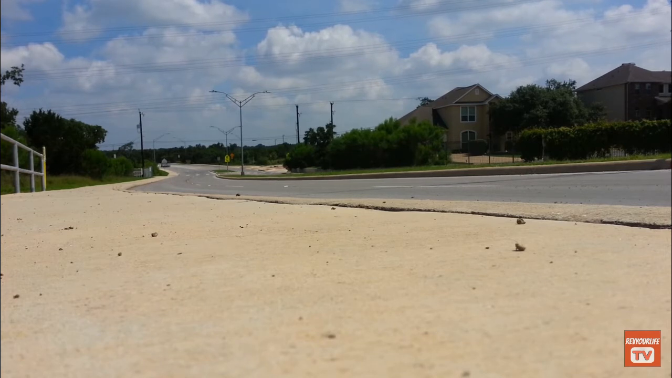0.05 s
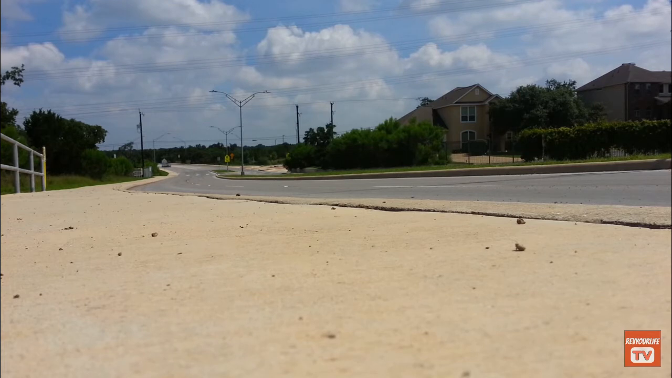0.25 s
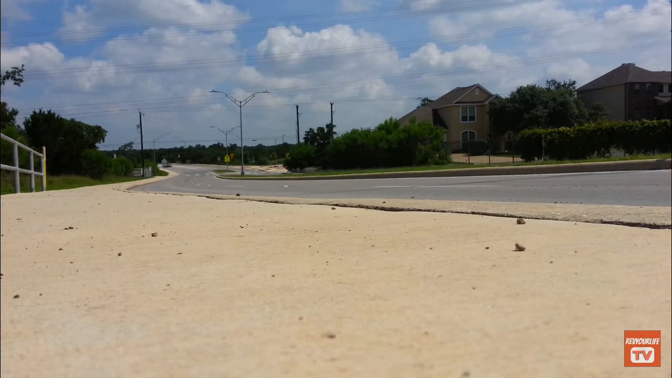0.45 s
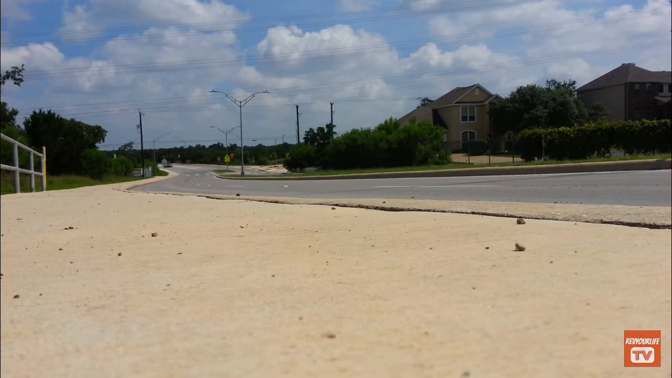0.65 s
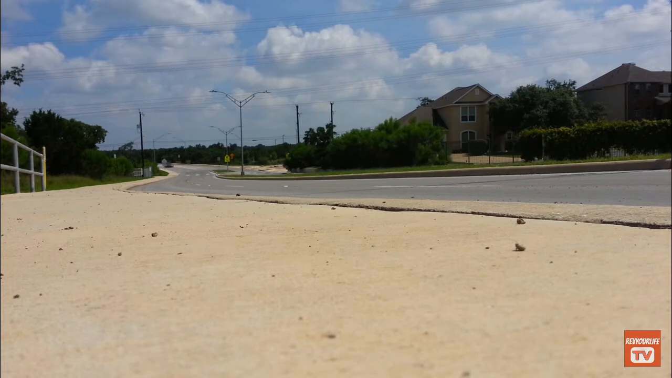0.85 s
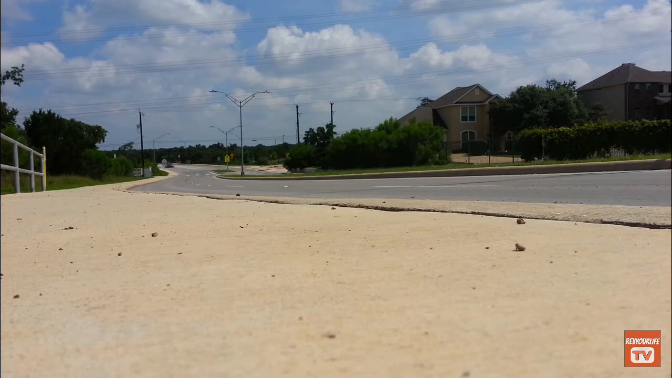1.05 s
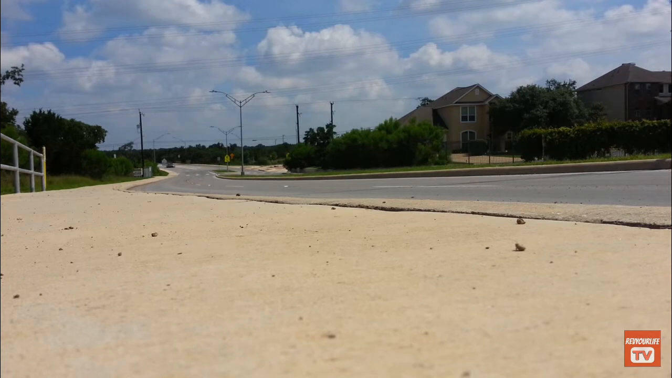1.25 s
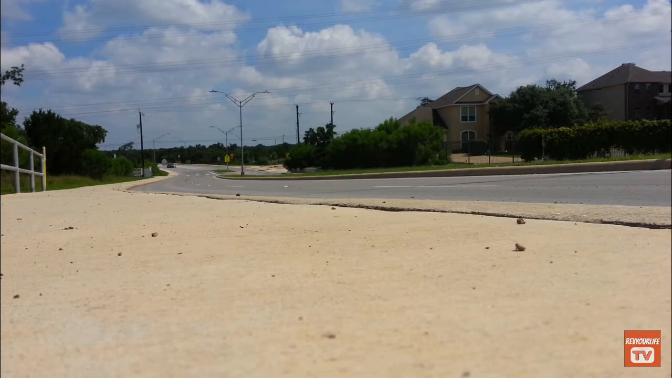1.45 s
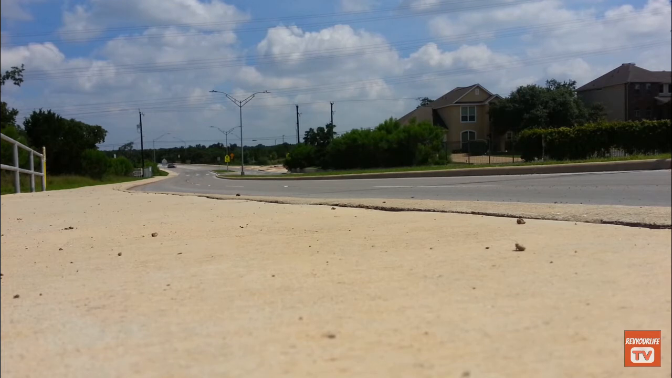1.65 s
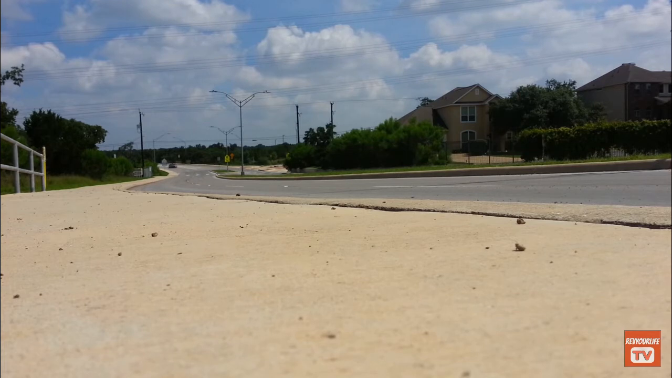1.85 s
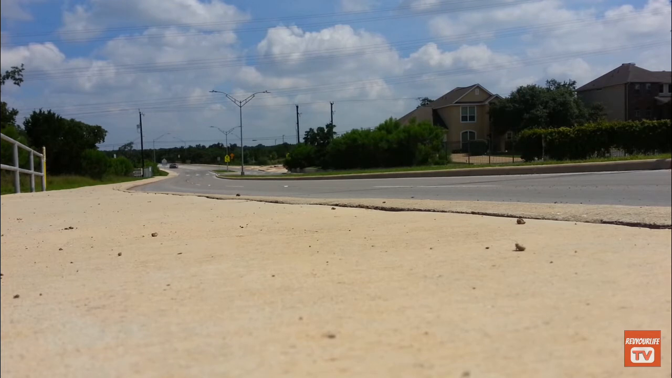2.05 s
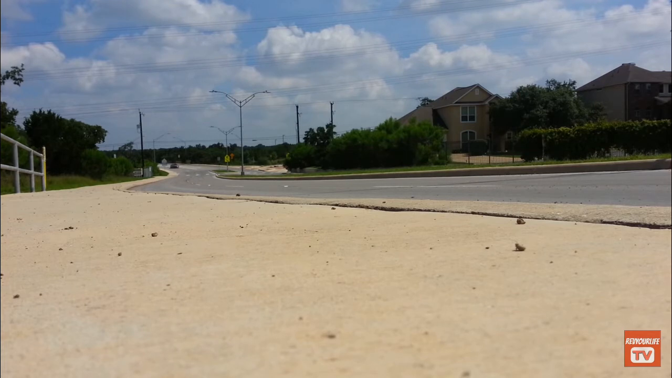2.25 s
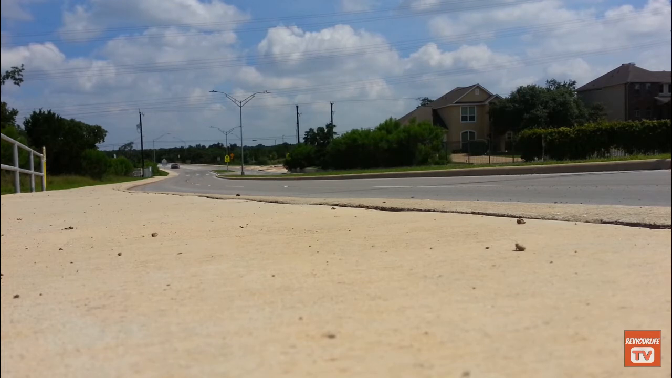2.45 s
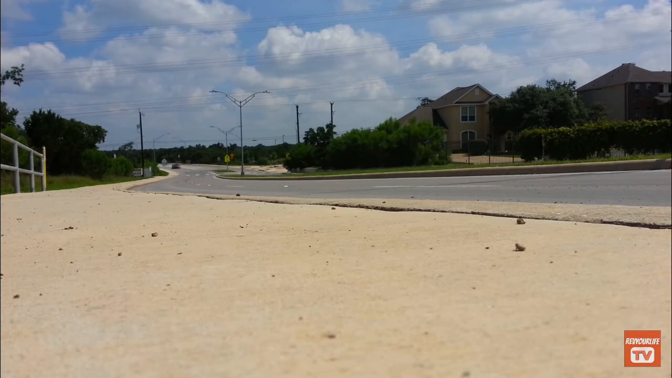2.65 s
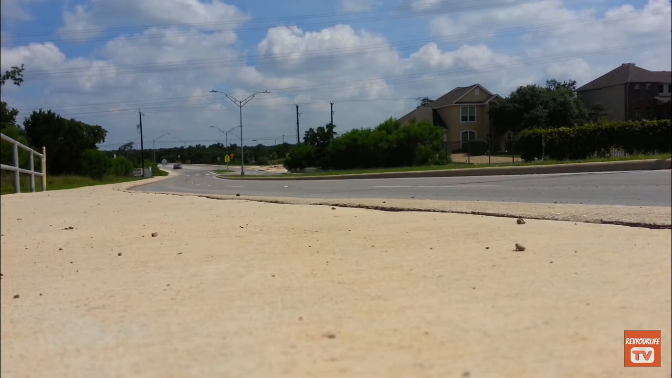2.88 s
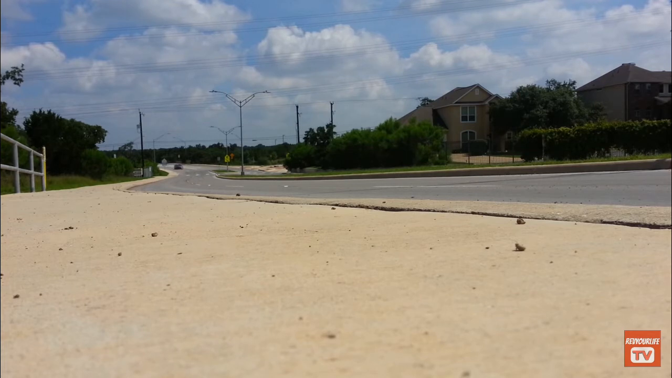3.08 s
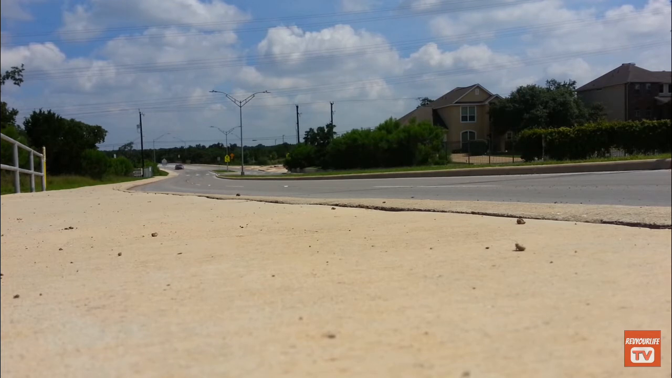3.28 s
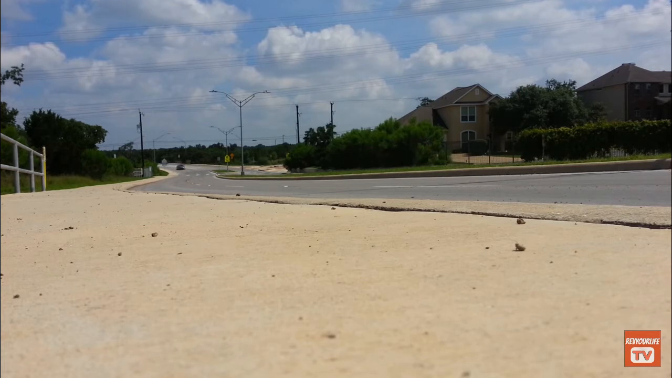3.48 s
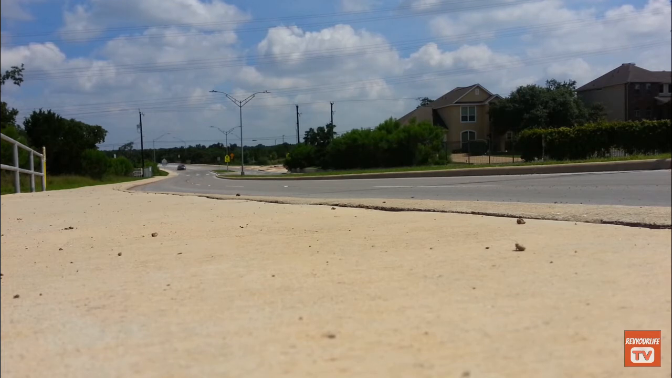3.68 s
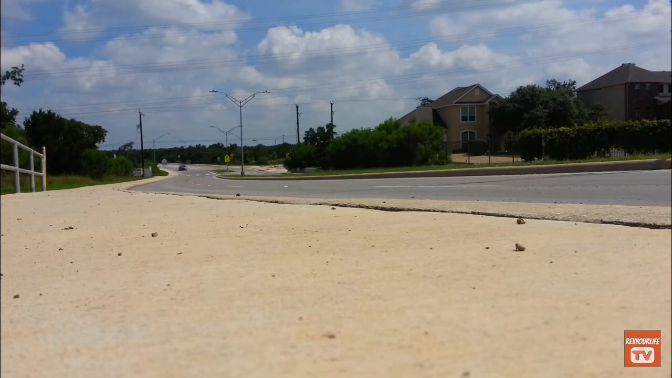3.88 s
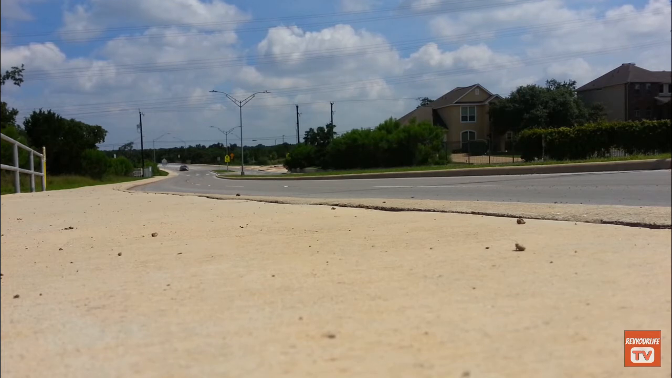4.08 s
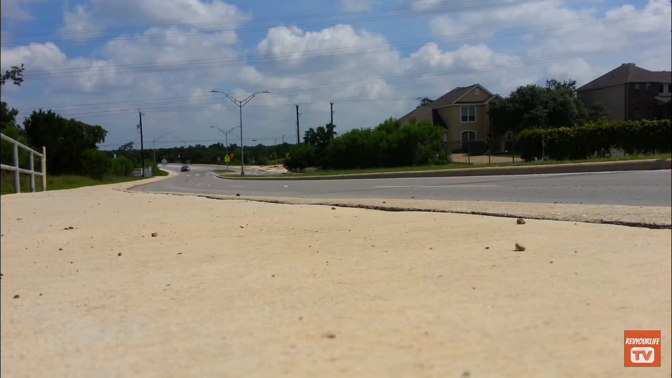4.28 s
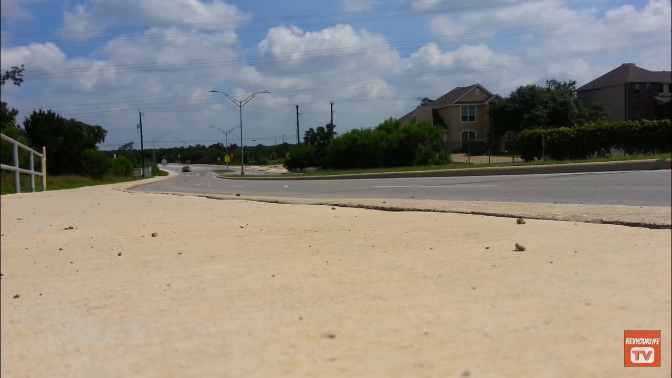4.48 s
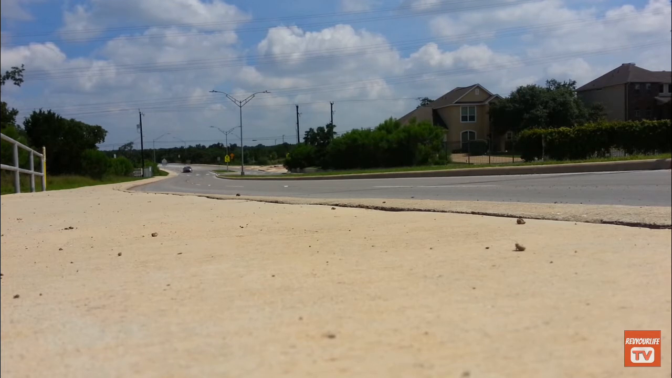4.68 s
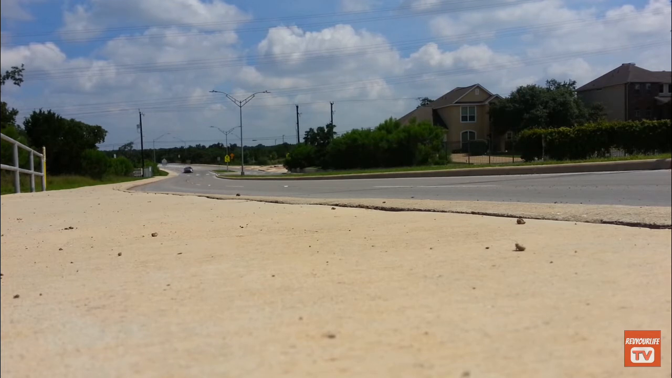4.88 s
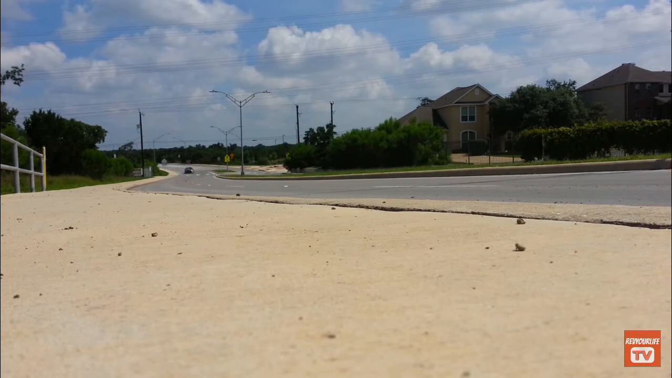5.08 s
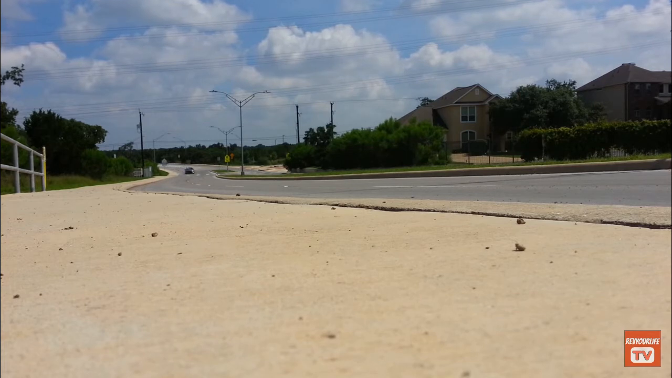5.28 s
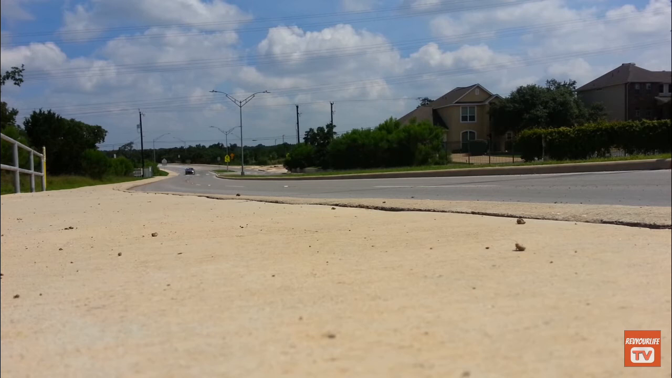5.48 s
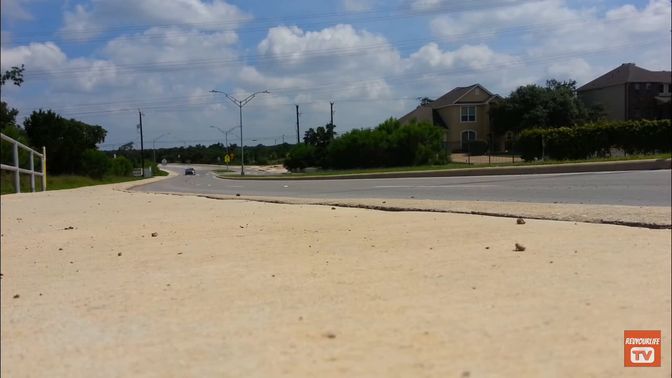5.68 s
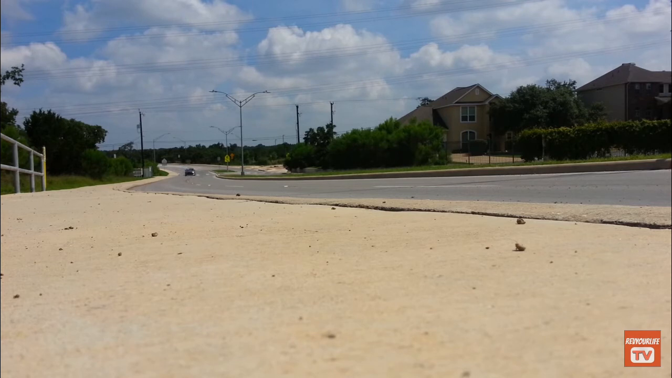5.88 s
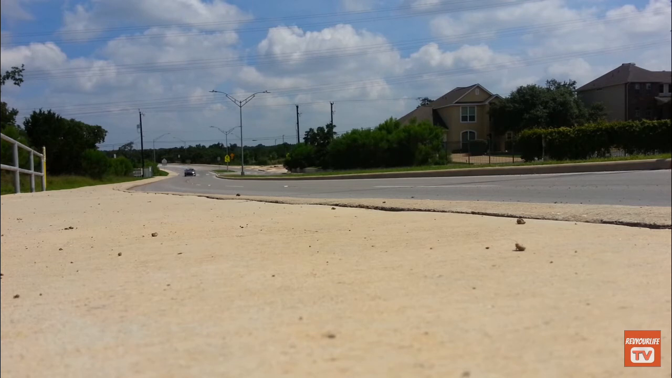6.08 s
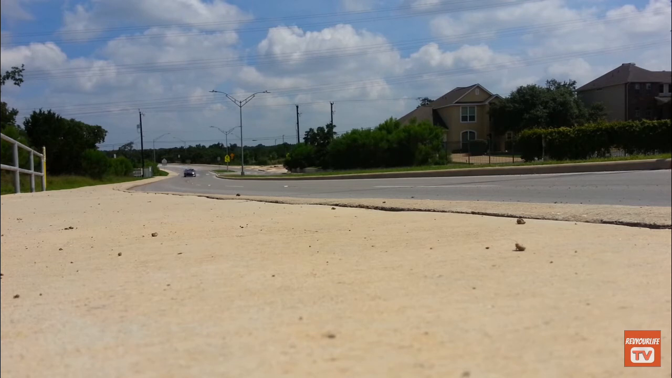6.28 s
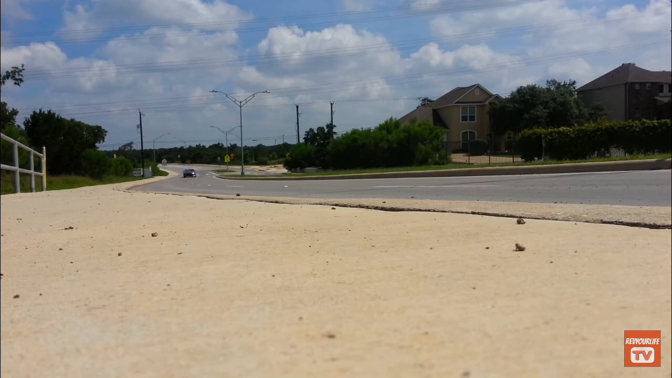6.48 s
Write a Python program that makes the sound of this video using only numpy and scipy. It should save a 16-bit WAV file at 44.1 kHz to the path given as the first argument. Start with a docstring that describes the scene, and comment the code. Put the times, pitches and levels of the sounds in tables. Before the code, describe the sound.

Insect rattle and repeated bird whistles over quiet roadside air, then a distant turbocharged car launches hard, chirps its tyres changing gear and roars closer.

```python
"""An insect rattles and a bird repeats a short phrase while a turbocharged six-cylinder car holds its revs.
Then the car pulls away hard along a suburban road, chirps its tyres at a gear change and pulls on.
Firings ring the exhaust with a puff of gas each, filtered noise makes tyre and intake roar, house fronts echo it.
The insect is noise ringing its body, the bird is sliding tones; a few sharp ticks fall in pitch close by."""
import sys
import numpy as np
from scipy import signal
from scipy.fft import rfft, irfft, next_fast_len
from scipy.io import wavfile
from scipy.ndimage import uniform_filter1d

SR = 44100
rng = np.random.default_rng(int(sys.argv[2]) if len(sys.argv) > 2 else 0)


def log_audio(samples):
    """Write samples as a 16-bit WAV file to the path given in sys.argv[1]."""
    # one column per channel
    frames = np.atleast_2d(samples).T
    # limit to full scale, then quantise
    limited = np.clip(frames, -1, 1)
    pcm = np.round(limited * 32767).astype(np.int16)
    wavfile.write(sys.argv[1], SR, pcm)


N = 288414
TIME = np.arange(N) / SR


def undb(db):
    """Turn decibels into gain."""
    return 10 ** (np.asarray(db) / 20)


def unit(x):
    """Scale to rms 1."""
    return x / np.sqrt(np.mean(x ** 2))


def curves(table):
    """Draw each column of a table of (seconds, values) as a signal, with straight lines between rows."""
    s, *columns = np.transpose(table)
    return [np.interp(TIME, s, column) for column in columns]


def noise():
    """White noise: all pitches equally strong."""
    return rng.standard_normal(N)


def colour(x, points):
    """Filter by a spectrum of (Hz, dB) points, then scale to rms 1."""
    hz, db = np.transpose(points)
    size = next_fast_len(N + SR)
    f = np.maximum(np.fft.rfftfreq(size, 1 / SR), 1)
    gain = undb(np.interp(np.log(f), np.log(hz), db))
    return unit(irfft(rfft(x, size) * gain, size)[:N])


def ring(x, hz, width):
    """One resonance, with gain 1 at its centre; width in Hz."""
    return signal.lfilter(*signal.iirpeak(hz, hz / width, fs=SR), x)


def band(hz, width):
    """Turbulence in a steep resonance: noise passed twice through it; rms 1."""
    return unit(ring(ring(noise(), hz, width), hz, width))


def walk(rate):
    """Smooth random wandering that picks a new value rate times a second; rms 1."""
    k = max(int(SR / rate), 1)
    steps = np.repeat(noise()[:N // k + 1], k)
    return unit(uniform_filter1d(steps, k)[:N])


def sine(hz):
    """A tone that follows a pitch curve."""
    return np.sin(2 * np.pi * np.cumsum(hz) / SR)


def add(out, s, sound):
    """Mix a short sound in at time s."""
    i = int(s * SR)
    out[i:i + len(sound)] += sound[:len(out) - i]


def bouts(table, attack_s, sag_db_per_s):
    """Loudness curve of rows (start s, length s, dB, release s): attack, sagging hold, fading release."""
    out = 0
    for s, length, db, release_s in table:
        t = np.maximum(TIME - s, 0)
        attack = np.minimum(t / attack_s, 1)
        release = np.exp(-np.maximum(t - length, 0) / release_s)
        out = out + attack * undb(db - sag_db_per_s * t) * release
    return out


def car():
    """Exhaust, silencer, turbocharger and tyres, driven by the firing rate and the load."""
    # Revs held, launch, first gear, shift, second gear. Each row: time in seconds, firing rate in Hz.
    revs = [(0, 122), (1.55, 129), (2.42, 143.5), (2.56, 85), (2.8, 118), (3.0, 143), (3.25, 163.3),
            (3.45, 182), (3.72, 197), (4.1, 245), (4.5, 324), (4.6, 335), (4.71, 333), (4.92, 226),
            (5.05, 226), (5.38, 256), (5.55, 277), (5.95, 306), (6.54, 348)]
    # How hard the car works. Each row: time in seconds, exhaust rasp in dB, tyre and intake rush in dB,
    # both before the fixed boosts below.
    load = [(0, -83, -64), (.8, -58, -64.5), (1.15, -66.5, -67), (2.5, -56, -69.5), (2.9, -51, -68.5),
            (3.3, -48, -63), (3.5, -46, -54.5), (4, -44, -53.5), (4.45, -35.5, -42), (4.9, -34.5, -42.5),
            (5.1, -34.5, -48.5), (5.4, -36.5, -46.5), (5.95, -35, -45), (6.25, -32.5, -40),
            (6.54, -30, -41)]
    # Unsteadiness of the exhaust note. Each row: time in seconds, amount from 0 to 1.
    roughness = [(0, .25), (2.6, .1), (3.6, .08), (4.0, .2), (4.2, .28), (4.8, .26), (5.05, .22),
                 (5.4, .12), (5.9, .08), (6.54, .1)]
    hz = curves(revs)[0]
    rasp_db, rush_db = curves(load)
    turns = np.cumsum(hz * (1 + .002 * walk(30))) / SR  # firings so far
    exhaust = exhaust_note(turns, hz, curves(roughness)[0]) + undb(rasp_db + 0.96) * exhaust_rasp(turns)
    return exhaust + silencer_boom() + turbo_hiss(rasp_db) + undb(rush_db + 4.5) * rush()


def exhaust_note(turns, hz, rough):
    """The strongest orders (multiples) of the firing rate; turbulence shakes their size and phase."""
    # The firing tone ahead of the pipe's resonances. Each row: time in seconds, level in dB.
    firing_tone = [(2.6, -68), (2.88, -35.5), (3.35, -44), (3.5, -25), (3.89, -27), (4.0, -48), (4.1, -27),
                   (4.33, -34.5), (4.47, -29.5), (4.78, -26), (4.95, -27), (5.25, -22.5), (5.42, -19.5),
                   (5.7, -31.5), (5.9, -19.5), (6.14, -22), (6.27, -30.5), (6.42, -19.5)]
    # Its overtones ahead of the pipe's resonances. Each row: time in seconds, level in dB.
    overtones = [(0, -72), (.8, -54), (2.3, -58), (2.56, -57), (2.66, -49.5), (2.81, -44), (2.97, -37),
                 (3.12, -32.5), (3.35, -41), (3.49, -27), (3.6, -35.5), (3.75, -30), (4.0, -37.5),
                 (4.5, -29.5), (4.8, -27), (5.05, -28), (5.8, -33), (6.54, -28.5)]
    # Balance against the second order. Each row: time in seconds, half orders in dB, third order in dB.
    order_mix = [(1.5, -13, -6), (2.15, 1, -11), (2.65, -19, 1), (2.83, -16, 5), (3.02, -18, -4.5),
                 (3.7, -20.5, -8), (4.2, -12.5, -7), (5.9, -17.5, -6), (6.38, 8.5, -10), (6.54, -2.5, -4)]
    # Each order swells as the revs carry it through a pipe resonance. Each row: pitch in Hz, gain in dB.
    order_gain = [(120, -18.5), (165, -25.5), (200, -16.5), (240, -8.5), (305, -1.5), (335, -1.5), (363, 3),
                  (400, -16), (450, -10), (505, -8), (570, -1.5), (640, -1), (700, -3.5), (850, -6)]
    tone_db, over_db = curves(firing_tone)[0], curves(overtones)[0]
    # unequal cylinder banks raise the half orders together
    half_db, third_db = over_db + np.array(curves(order_mix))
    orders = [(1, tone_db), (1.5, half_db - 7), (2, over_db), (2.5, half_db), (3, third_db)]
    pipe_hz, pipe_db = np.transpose(order_gain)
    out = 0
    for k, db in orders:
        resonance_db = np.interp(np.log(k * hz), np.log(pipe_hz), pipe_db)
        # the complex number moves size and phase at once
        shake = 1 + rough * np.sqrt(k) * (walk(50) + 1j * walk(50))
        tone = np.exp(2j * np.pi * (k * turns + rng.random()))
        out = out + undb(db + resonance_db) * np.real(shake * tone)
    return out


def exhaust_rasp(turns):
    """Unequal cylinders fire into the pipe, each followed by a puff of gas."""
    # Each entry: strength of one cylinder's firing in dB, before a small random change at every firing.
    cylinders_db = [-1.1, -1.24, -0.36, -1.45, -2.13, -2]
    # Tone colour of the exhaust pipe. Each row: pitch in Hz, relative level in dB.
    pipe = [(100, -56), (170, -27), (230, -8), (310, 1.5), (365, -1), (430, -2.5), (530, 2.5), (620, 4.5),
            (850, 1.5), (1050, -8.5), (1250, -7), (1500, -15.5), (2500, -24.5), (5000, -37), (12000, -80)]
    firing = np.flatnonzero(np.diff(np.floor(turns)))
    pulses = np.zeros(N)
    pulses[firing] = undb(np.resize(cylinders_db, len(firing)) + noise()[:len(firing)])
    # only the unevenness of the firings sounds between the main orders
    pulses[firing] -= pulses[firing].mean()
    gas = noise() * np.exp(-(turns % 1) / 0.55)  # fades from each firing to the next
    muffled = silencer(unit(pulses) + undb(-1) * unit(gas))
    return colour(muffled, pipe) * undb(.5 * walk(25))


def silencer(x):
    """Chambers pass every pitch alike but smear each pulse over many milliseconds."""
    for lag in (67, 109, 173):  # chamber delays in samples
        loop = np.r_[1, np.zeros(lag - 1), .5]
        x = signal.lfilter(loop[::-1], loop, x)
    return x


def silencer_boom():
    """The silencer booms at one low pitch: noise in a narrow resonance."""
    # Each row: time in seconds, level in dB.
    boom_level = [(0, -78), (1.6, -71), (2.1, -58.5), (2.6, -56), (3.1, -57.5), (3.6, -41), (3.9, -45),
                  (4.2, -56)]
    return band(hz=360.7, width=51) * undb(curves(boom_level)[0])


def turbo_hiss(rasp_db):
    """The turbocharger's hiss is high turbulence that grows faster than the exhaust rasp."""
    full_load_db, hiss_db = -30, -48.5  # rasp setting at full load, and the hiss level there
    slope = 1.9  # dB of hiss for each dB of rasp
    return band(hz=6460, width=700) * undb(hiss_db + slope * (rasp_db - full_load_db))


def rush():
    """Tyre roar and intake noise: coloured noise, swelling slightly."""
    # Each row: pitch in Hz, relative level in dB.
    rush_colour = [(300, -35.5), (800, 8.5), (1300, 1.5), (2000, 0), (2500, -3), (3100, -11.5), (3800, -11),
                   (5200, -17.5), (6600, -15), (7500, -15), (8500, -36), (10000, -52)]
    return colour(noise(), rush_colour) * undb(.5 * walk(22))


def tyre_chirp():
    """The tread sticks and slips as the next gear bites; a higher tread mode rings along."""
    # Slips at the gear change. Each row: start in seconds, length in seconds, level in dB, release in seconds.
    slips = [(4.833, .036, -34, .008), (4.887, 0.033, -27.5, .004), (4.968, .025, -35.5, 0.017),
             (5.02, 0.24, -47, .05)]
    # Slips that ring the higher mode. Each row: start in seconds, length in seconds, level in dB,
    # release in seconds.
    high_slips = [(4.872, .03, -48.5, .008), (4.968, 0.026, -49, 0.015)]
    hz = 2072 * (1 + .014 * walk(400))
    tread = unit(sine(hz) + undb(-26.0) * sine(2 * hz) + undb(-12.5) * band(hz=2020, width=240))
    low = tread * bouts(slips, attack_s=0.013, sag_db_per_s=8)
    high = band(hz=3700, width=140) * bouts(high_slips, attack_s=0.01, sag_db_per_s=9)
    return (low + high) * undb(0.98 * walk(120))


def insect():
    """Restless noise, throbbing about 22 times a second, rings the insect's body."""
    # Bouts of rattling. Each row: start in seconds, length in seconds, level in dB, release in seconds.
    rattles = [(-.02, 0.86, -41, 0.15), (1.15, .025, -51.5, 0.018), (1.2, 0.6, -60, 0.56),
               (2.36, 0.019, -54, .012)]
    # Resonances of the body. Each row: pitch in Hz, width in Hz, relative level in dB.
    modes = [(3830, 630, -14.5), (4880, 70, -4), (5020, 78, -2.5), (5380, 200, -10.5), (6850, 270, -3.5),
             (7150, 36, 2), (7360, 50, -7), (7300, 54, -8.5), (7430, 58, 1)]
    rasp_colour = [(1500, -24.5), (3800, -3.0), (6000, -3.0), (7300, 7.5),
                   (8500, -24.5), (11000, -50.0), (16000, -40)]  # Hz, relative dB
    throb = undb(2.0 * sine(22 * (1 + 0.09 * walk(9))) + walk(40))
    clicks = noise() * throb * undb(3.4 * walk(900))
    body = sum(undb(db) * ring(ring(clicks, hz, 500), hz, width) for hz, width, db in modes)
    rasp = colour(noise(), rasp_colour) * throb
    return unit(unit(body) + undb(-1.5) * rasp) * bouts(rattles, attack_s=0.021, sag_db_per_s=5.5)


def bird():
    """Fluttering whistled notes that slide quickly toward their last pitch; high notes flutter most."""
    # Repeats of the phrase; the last breaks off early. Each row: start in seconds, length in seconds
    # (later notes are left out), change of level in dB.
    repeats = [(.405, .48, -3), (.868, .48, 0), (1.327, .48, -1.5), (1.795, .48, -1.5), (2.274, .25, -1.5)]
    # Notes of the phrase. Each row: seconds into the phrase, length in seconds, first pitch in Hz,
    # last pitch in Hz, level in dB before the repeat's change.
    phrase = [(0, .06, 3980, 2670, -46), (0.088, 0.0264, 3072, 2450, -50.5), (.135, 0.083, 2543, 2497, -52),
              (.22, 0.13, 2496, 2512, -50), (.277, 0.023, 3866, 3500, -39), (.3, 0.27, 3980, 3960, -60),
              (.4, .08, 5360, 6160, -55)]
    # Notes outside the phrase. Each row: start in seconds, length in seconds, first pitch in Hz,
    # last pitch in Hz, level in dB.
    stray_notes = [(.815, .049, 5800, 6140, -47), (1.185, 0.025, 3300, 2980, -50.5),
                   (1.745, .023, 3600, 3570, -51), (2.04, 0.087, 5050, 4910, -52.5),
                   (2.258, 0.076, 6300, 5900, -54.5), (2.257, 0.074, 5900, 5340, -56),
                   (2.77, 0.11, 2534, 2510, -59)]
    notes = list(stray_notes)
    for start, sung_s, phrase_db in repeats:
        for s, length, first_hz, last_hz, db in phrase:
            if s < sung_s:
                notes.append((start + s, length, first_hz, last_hz, db + phrase_db))
    out, flutter = np.zeros(N), walk(500)
    for s, length, first_hz, last_hz, db in notes:
        u = np.linspace(0, 1, int(length * SR))  # progress through the note
        hz = last_hz + (first_hz - last_hz) * (1 - u) * np.exp(-1.6 * u)
        hz = hz * (1 + .009 * (last_hz / 3600) * flutter[int(s * SR):][:len(u)])
        add(out, s, undb(db) * np.sin(np.pi * u) * sine(hz))
    return out * undb(1.8 * walk(90))


def harsh_chirp():
    """The bird's one rasping, buzzing chirp: a band of noise with no clean pitch."""
    # Each row: start in seconds, length in seconds, level in dB, release in seconds.
    chirps = [(1.146, 0.02, -45, 0.02)]
    return band(hz=3670, width=600) * bouts(chirps, attack_s=.005, sag_db_per_s=5)


def ticks():
    """Each tick's treble arrives first and its lows a few milliseconds later; soft thumps sink lower."""
    # Sharp ticks that fall in pitch. Each row: time in seconds, level in dB before the fade curve.
    sharp = [(1.2708, -42), (3.2055, -35.5), (6.1076, -18.5)]
    # Soft low thumps. Each row: time in seconds, level in dB before the fade curve.
    soft = [(2.282, -42), (2.378, -38)]
    out, t = np.zeros(N), TIME[:SR // 25]
    for s, db in sharp:
        falling_tone = sine(250 + 9000 / (1 + t / 0.00031))
        fade = (1 - np.exp(-t / 0.00021)) * np.exp(-t / 0.014)
        add(out, s, undb(db) * falling_tone * fade)
    for s, db in soft:
        sinking_tone = sine(110 + 300 * np.exp(-t / 0.0065))
        fade = t / 0.0032 * np.exp(1 - t / 0.00287)
        add(out, s, undb(db) * sinking_tone * fade)
    return out


def air():
    """Distant traffic and hiss as coloured noise, with a faint electrical hum."""
    # Each row: pitch in Hz, relative level in dB.
    air_colour = [(20, -26), (50, -14), (160, -12.5), (230, -2.5), (450, -5.5), (850, -4.5), (1400, -21),
                  (2400, -11.5), (4300, -16), (5600, -20), (7100, -12.5), (8200, -27.5), (10000, -39),
                  (15000, -37.5)]
    hum = undb(-68) * sine(120 + 0.84 * walk(3.4))
    return colour(noise(), air_colour) * undb(-55 + 1.2 * walk(8.3)) + hum


def street(x, wet_db, t60, echoes=()):
    """A thin diffuse tail from trees, fading 60 dB in t60 seconds, and separate echoes from house fronts."""
    tail = rng.standard_normal(SR) * undb(-60 * TIME[:SR] / t60)
    response = undb(wet_db) * tail / np.linalg.norm(tail)
    for delay, db in echoes:
        add(response, delay, undb([db]))
    return x + signal.fftconvolve(x, response)[:N]


def scene():
    """Car and bird in the street, with the insect, ticks and air added without echo."""
    # House fronts. Each row: delay of the echo in seconds, level in dB.
    house_fronts = [(.068, -10), (.135, -18), (.29, -20)]
    road = street(car(), wet_db=-9.0, t60=0.56, echoes=house_fronts)
    road = road + street(tyre_chirp(), wet_db=-14.0, t60=0.43)
    verge = street(bird() + harsh_chirp(), wet_db=-3.0, t60=0.37) + insect()
    return (road + verge + ticks() + air())[None]


def record(dry):
    """A steep low-pass filter removes the treble above 15700 Hz."""
    return signal.sosfilt(signal.ellip(8, .2, 70, 15700, fs=SR, output="sos"), dry)


dry = scene()
out = record(dry)
log_audio(out)
```